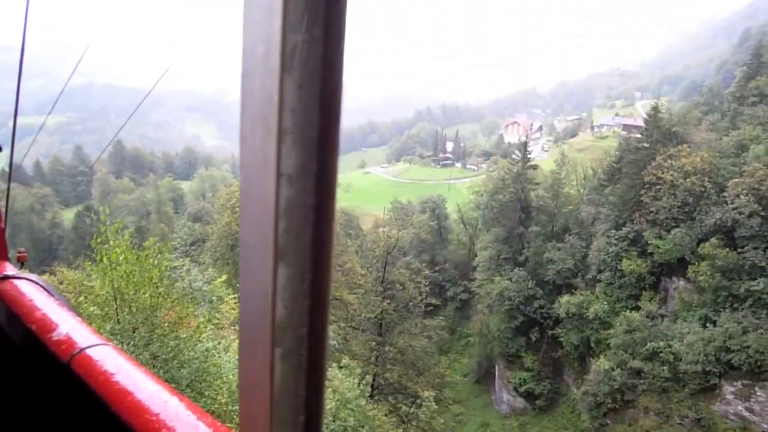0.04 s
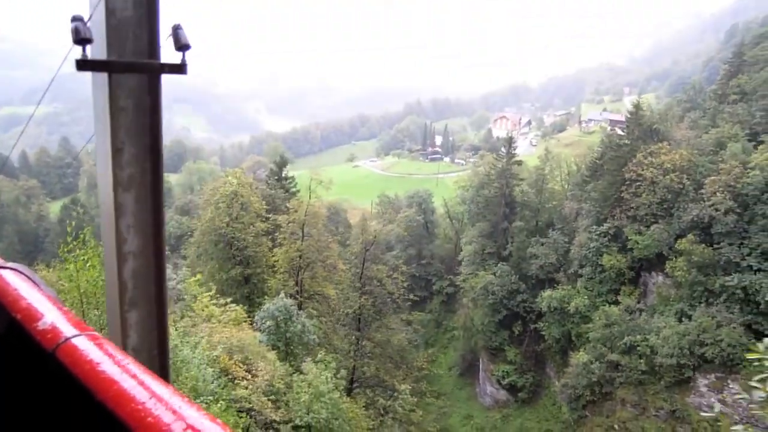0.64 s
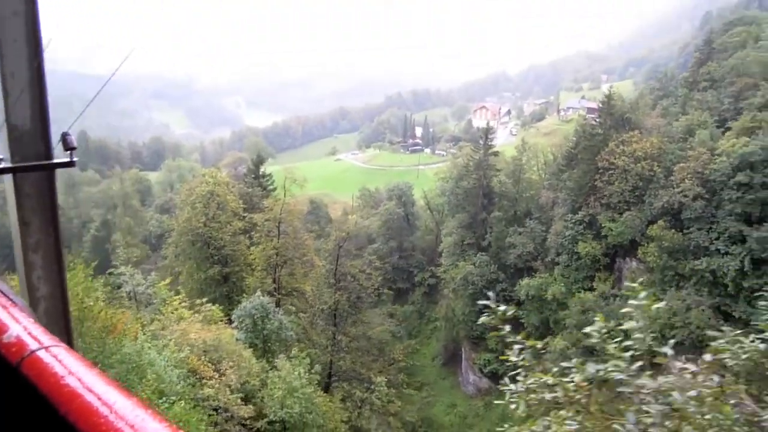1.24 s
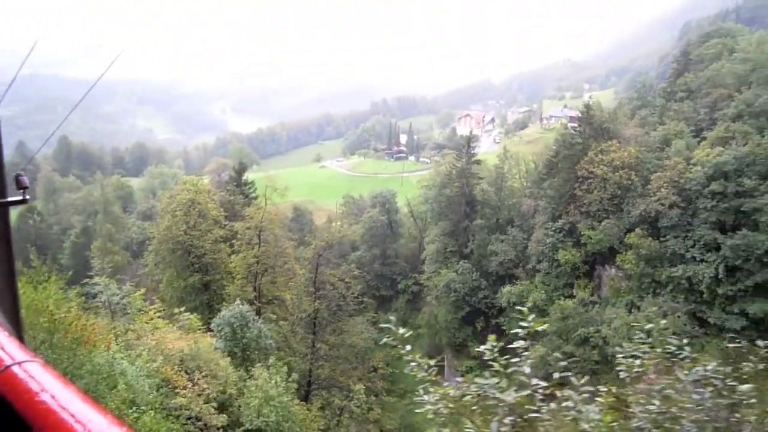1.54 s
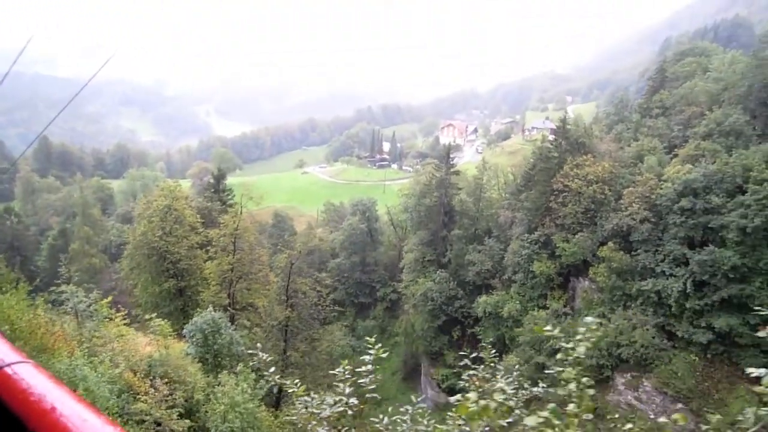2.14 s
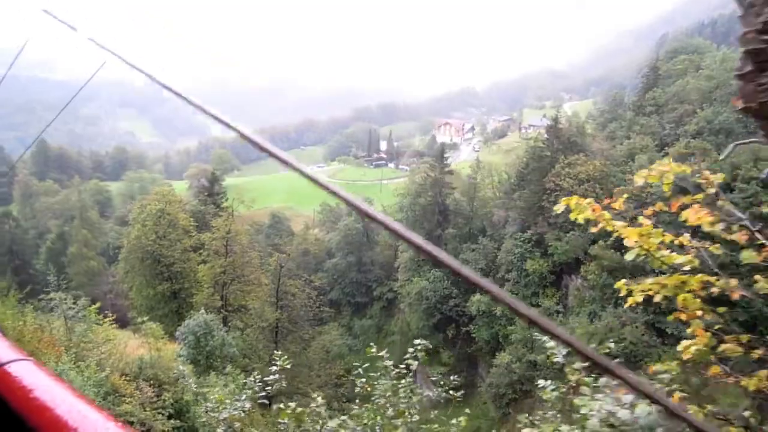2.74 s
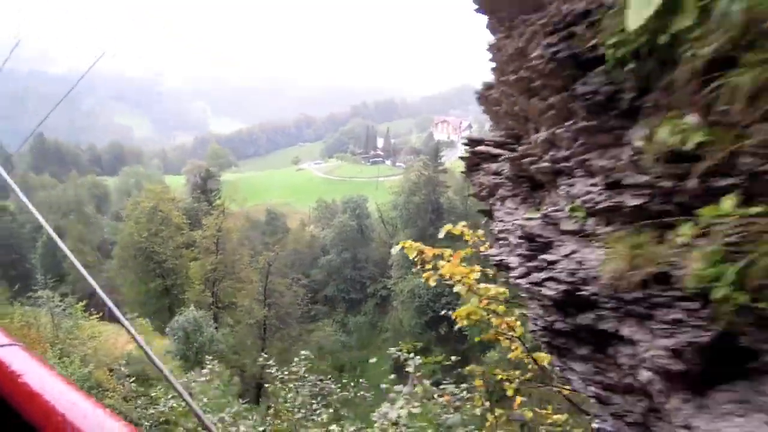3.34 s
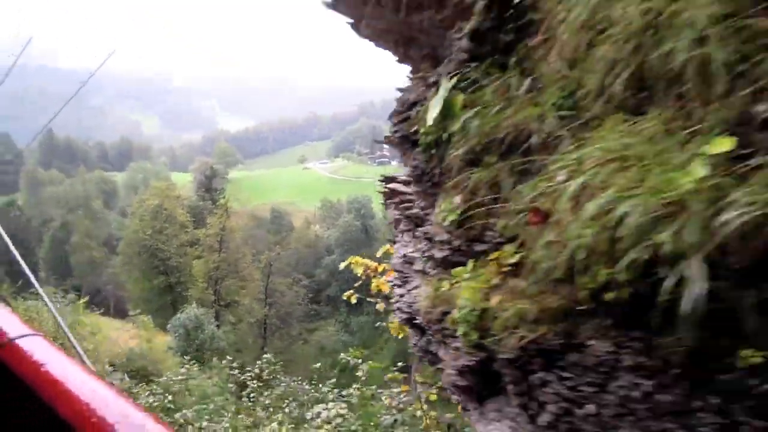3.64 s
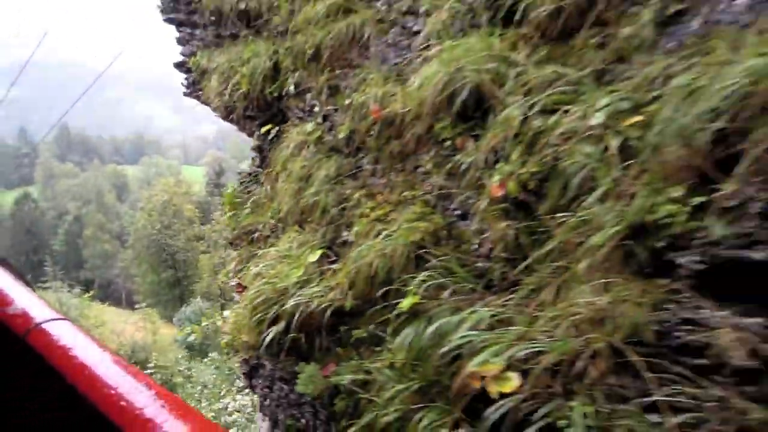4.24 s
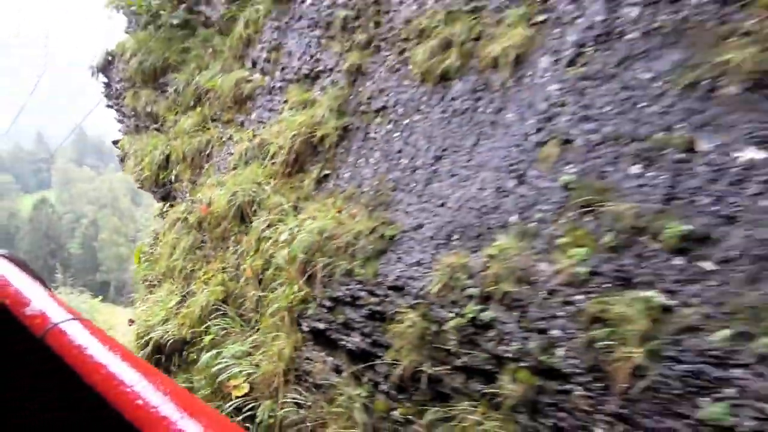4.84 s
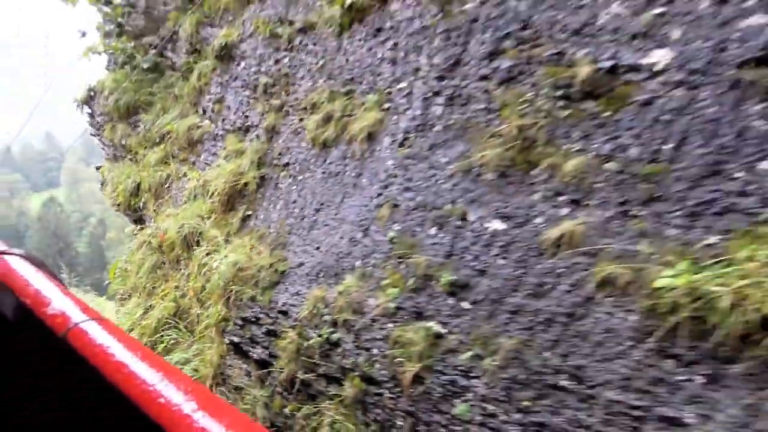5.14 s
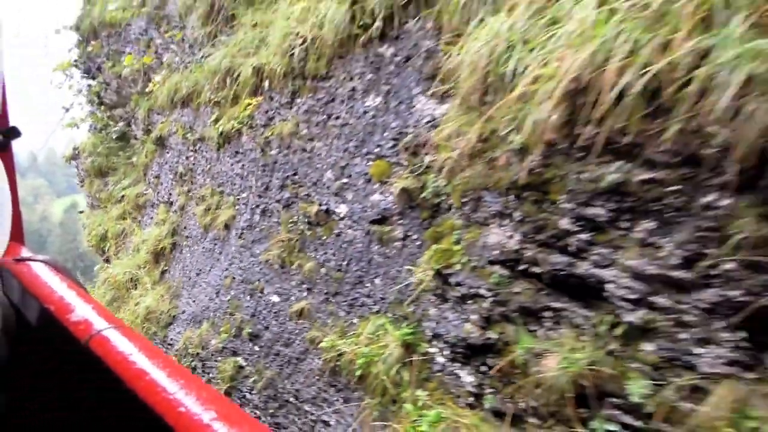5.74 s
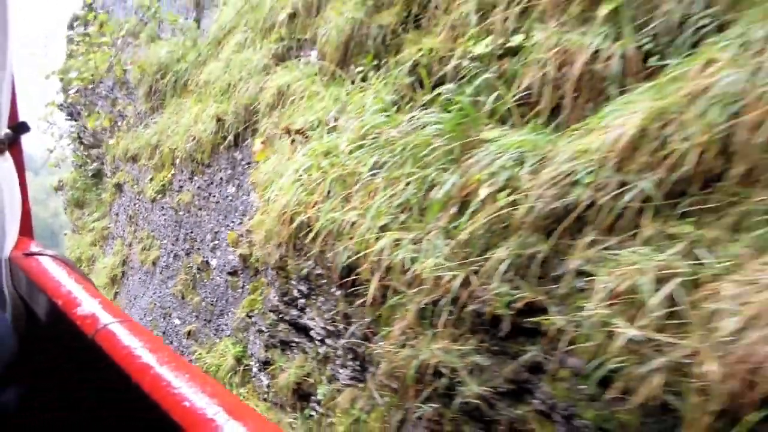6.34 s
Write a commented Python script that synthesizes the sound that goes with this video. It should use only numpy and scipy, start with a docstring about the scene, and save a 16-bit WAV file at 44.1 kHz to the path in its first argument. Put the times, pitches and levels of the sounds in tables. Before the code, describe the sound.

A funicular car rolls throughout with a low rumble and a steely rail hiss, heard from an open window. At about 0.8 seconds a thump and a puff of wind hit, with a quick run of dry clacks, and the rolling noise dips until 1.5. Short wheel squeaks, ticks and crunches of grit follow to about 2.3. From there to 4.1 a wheel rubs the rail in a thin, flickering squeal, strongest near 3.2, among knocks and floor jolts. The roar grows a little fuller as a rock face comes alongside. Around 4.4 comes a heavy jolt with a rattle, a gust and a swish of air; the rolling falls away over the continuing rumble. It builds again from 5.3 with clicks, knocks and a low cabin drone. A last gusty thump near 6 seconds leaves the rolling quieter.

```python
"""Funicular car from an open window.

The wheels rumble through the car body and hiss and ring on the rails; a flange rubs, a wheel squeaks.
The car jolts, fittings knock and tick, grit is crushed and the cabin drones; the rolling noise dips
after each big thump. Air swishes and buffets the two microphone ports; a rock face throws sound back."""
import sys
import numpy as np
from scipy import signal
from scipy.fft import rfft, irfft
from scipy.io import wavfile
from scipy.ndimage import uniform_filter1d

SR = 44100
rng = np.random.default_rng(int(sys.argv[2]) if len(sys.argv) > 2 else 0)


def bounce(signal):
    """Save signal as a 16-bit WAV file at the path given by the first command-line argument."""
    frames = np.transpose(np.atleast_2d(signal))
    limited = np.clip(frames, -1, 1)
    pcm = np.round(limited * 32767).astype(np.int16)
    wavfile.write(sys.argv[1], SR, pcm)


N = 286297
TIME = np.arange(N) / SR
HZ = np.fft.rfftfreq(N, 1 / SR)


# Rolling noise spectra: f/Hz, relative level/dB
BODY_SPECTRUM = [(120, -40), (220, 0), (270, -0.5), (370, -2), (520, -5), (620, -7), (780, -7),
                 (900, -12.5), (1200, -15), (4500, -66)]
RAIL_SPECTRUM = [(500, -27), (800, -5), (1000, -7), (1450, 1.5), (2300, 0), (2800, -4), (3300, -5.5),
                 (4000, -10), (4700, -18.5), (5800, -16.5), (10000, -26)]
HISS_SPECTRUM = [(2000, -38), (3800, 4), (5200, 1.5), (7000, -2), (9000, -4.5), (10500, -8.5),
                 (12000, -10.5), (14500, -26)]
# Wheel and rail modes: f/Hz, width/Hz, relative level/dB
WHEEL_MODES = [(794, 45, 0), (1470, 130, -5), (1760, 55, -2), (2240, 140, -1.5), (3146, 190, -2.5),
               (3440, 190, -4.5), (4560, 440, 2), (5200, 390, -6.5)]
def rolling(body_gain, rail_gain, hiss_gain, bumps):
    """Uneven rails drive the car body, the rails and the ringing wheels together."""
    roar = patchy(colour(grit(per_s=250, spread_db=1, share=0.18), BODY_SPECTRUM), depth_db=1.5)
    steel = patchy(colour(grit(per_s=900, spread_db=3, share=0.32), RAIL_SPECTRUM), depth_db=2.5)
    hiss = patchy(colour(grit(per_s=1500, spread_db=3.5, share=0.16), HISS_SPECTRUM), depth_db=2.5)
    wheel_db = -5 - 3.5 * beside_rock() + 0.77 * drift(rate_hz=14)
    return (body_gain * amp(-1.13 + bumps) * roar
            + rail_gain * amp(-1.38 + 0.91 * bumps) * steel
            + hiss_gain * amp(4.5 + 1.2 * bumps) * hiss
            + rail_gain * amp(wheel_db) * ring(noise(), WHEEL_MODES))


# Heard level of the rolling noise, dipping after each big thump: t/s, level/dB
ROLLING_LEVEL = [(0, -35), (0.82, -33), (0.835, -44), (1.28, -44.5), (1.6, -35), (2.1, -32), (3.25, -33.5),
                 (3.8, -33), (4.27, -35.5), (4.5, -32.5), (4.68, -50.5), (4.9, -53), (4.98, -45.5),
                 (5.2, -44.5), (5.32, -38), (5.68, -34.5), (6.02, -35), (6.16, -50), (6.49, -51.5)]
# Brief lulls in it: t/s, change/dB, half-length/s
LULLS = [(0.69, -1.5, .025), (0.88, -1, 0.053), (2.735, -3.5, 0.024), (3.02, -1.5, .04),
         (2.825, -3.5, 0.012), (3.85, -1, 0.031), (3.935, -2, 0.018), (5.46, -3, 0.048)]
def follow_rolling(base_db, slope, rock_db):
    """Level in dB of a layer that follows the rolling level and shifts beside the rock face."""
    usual_db = -32.5
    excess_db = np.interp(TIME, *np.transpose(ROLLING_LEVEL)) + rises_db(LULLS) - usual_db
    return base_db + slope * excess_db + rock_db * beside_rock()


# Response to the rolling level: base level/dB, slope/(dB/dB), change beside the rock/dB
LAYER_RESPONSE = {"rumble": (-22.5, 0.31, -0.62), "body": (-29, 0.82, 3.95), "rail": (-33, .96, 1.32),
                  "hiss": (-43.5, 0.98, -2.8)}
# Rough track: t/s, body roar rise/dB, half-length/s
ROUGH_TRACK = [(0.56, 7.5, 0.052), (1.69, 5.5, 0.029), (2.06, 3, 0.045), (2.38, 4, .03), (2.79, 7, 0.045),
               (3.69, 5.5, 0.055), (3.985, 3, 0.054), (4.37, 3.5, 0.18), (5.76, 2.5, 0.16)]
def ride_gains():
    """Gains of four layers; rough track lifts rumble and body, the leaning flange the rail."""
    level_db = {layer: follow_rolling(*response) for layer, response in LAYER_RESPONSE.items()}
    rough_db = rises_db(ROUGH_TRACK)
    open_air = amp(-56.5) * (1 - beside_rock())
    return (amp(level_db["rumble"] + 0.23 * rough_db),
            amp(level_db["body"] + rough_db),
            amp(level_db["rail"] + 0.39 * rises_db(FLANGE_LEANS)),
            np.hypot(amp(level_db["hiss"]), open_air))


# Car shake: f/Hz, relative level/dB
RUMBLE_SPECTRUM = [(8, -37), (20, -3), (38, -8), (58, -2), (95, -3), (120, -1.5), (145, -4.5), (175, -1.5),
                   (215, -9), (280, -17), (900, -100)]
# Floor jolts and panel booms: t/s, relative level/dB, f/Hz, half-length/s
FLOOR_JOLTS = [(0.485, -15.5, 125, 0.033), (0.829, -6, 119, 0.03), (0.905, -15, 131, 0.019),
               (0.99, -16, 124, 0.033), (1.06, -19, 87.8, 0.053), (1.432, -13.5, 124.8, 0.016),
               (2.015, -8, 122.6, 0.025), (2.39, -13, 119.2, 0.046), (2.54, -13.5, 109.7, 0.042),
               (2.67, -13, 125.2, 0.037), (3.662, -12, 135, 0.036), (3.912, -10.5, 122, 0.024),
               (4.008, -13.5, 108, 0.016), (4.11, -15.5, 89.4, 0.039), (4.40, -8, 119, 0.038),
               (5.59, -16, 118.8, 0.035), (5.96, -14.5, 119, 0.032), (6.24, -19.5, 125, 0.068)]
PANEL_BOOMS = [(2.372, -19.5, 538, 0.025), (3.70, -19, 350, 0.034), (3.645, -20.5, 230, .035),
               (3.955, -20.5, 249.4, 0.026), (3.6, -23, 697, 0.011), (3.962, -25, 1030, 0.011),
               (3.96, -29, 1220, 0.009), (4.40, -20, 350, 0.026), (4.478, -23, 740, 0.011),
               (4.48, -24, 990, 0.014)]
def rumble(gain):
    """The car shakes over a deep draught that slackens once; jolts swing the floor and panels boom."""
    shake = steadied(colour(noise(), RUMBLE_SPECTRUM), samples=3000)
    deep = lowpass(shake, cutoff_hz=70, power=6)
    draught = amp(2.5 - 9.5 * swell(peak_s=3.3, half_s=0.54))
    floor = amp(-1) * gain * (shake - deep + draught * deep)
    jolts = amp(-3.5) * tone_swells(FLOOR_JOLTS, waver=0.11, rate_hz=39)
    booms = amp(-2) * tone_swells(PANEL_BOOMS, waver=0.051, rate_hz=116)
    return floor + jolts + booms


# Flange leaning on the rail: t/s, rise/dB, half-length/s, f/Hz
FLANGE_LEANS = [(0.558, 5, 0.043, 1772), (2.26, 5, 0.062, 1750), (2.51, 8.5, 0.043, 1752),
                (2.623, 8, 0.055, 1794), (2.915, 9.5, 0.075, 1755), (3.201, 12, 0.13, 1773),
                (3.45, 9.5, 0.071, 1740), (3.764, 9, 0.04, 1793), (4.094, 7.5, 0.051, 1742)]
def flange():
    """The flange rubs the rail: a flickering note that swells and shifts pitch as it leans."""
    rest_hz = 1755
    pitch_hz = rest_hz + sum((hz - rest_hz) * swell(s, 2 * half_s) for s, _, half_s, hz in FLANGE_LEANS)
    phase = 2 * np.pi * np.cumsum(pitch_hz + 12 * drift(rate_hz=31)) / SR
    note = drift(rate_hz=56) * np.cos(phase) + drift(rate_hz=39) * np.sin(phase)
    flicker = amp(2 * drift(rate_hz=21))
    level_db = follow_rolling(base_db=-47, slope=0.65, rock_db=0) + rises_db(FLANGE_LEANS)
    return amp(level_db) * unit(note * flicker)


# Knocks: t/s, relative level/dB, decay/s, click level/dB
KNOCKS = [(0.797, -25.5, 0.014, -35), (0.813, -23.5, 0.0062, -32), (2.054, -28, 0.019, -37),
          (2.365, -25, 0.017, -36), (2.495, -21, 0.012, -40), (2.770, -19.5, .02, -35),
          (3.69, -18, 0.03, -50), (3.951, -20, 0.011, -40), (4.374, -20.5, 0.079, -37),
          (4.473, -27, 0.012, -40), (4.582, -34, .005, -52), (4.75, -35.5, 0.005, -64),
          (4.936, -31, 0.026, -41.5), (5.294, -25.5, 0.02, -31.5), (5.529, -29, 0.031, -36.5)]
# Fitting modes: f/Hz, width/Hz, relative level/dB
FITTING_MODES = [(390, 220, 3), (587, 240, -0.5), (789, 28, 0.5), (1098, 74, -4.5), (1440, 290, 3),
                 (1780, 270, -0.5), (2410, 78, -10), (2800, 250, -30), (4080, 340, -12)]
# Ticks and scuffs: t/s, level/dB, decay/s
TICKS = [(0.194, -35, .003), (0.4654, -28.5, 0.004), (0.517, -37, .003), (0.820, -29, 0.003),
         (1.563, -38, .003), (1.6128, -27, 0.028), (1.6637, -26.5, 0.0036), (2.2495, -27.5, 0.007),
         (2.3675, -31, .003), (2.663, -35, .003), (3.021, -33, .003), (5.0101, -37.5, .002),
         (5.04, -39, .002), (5.3404, -27, 0.0019), (5.352, -35, 0.05), (5.417, -35, 0.024),
         (5.536, -39, 0.02), (5.9285, -32.5, 0.012), (5.948, -29, 0.0028), (5.9669, -35, 0.014),
         (6.003, -33, 0.01)]
# Hard contact: f/Hz, relative level/dB
CLICK_SPECTRUM = [(300, -16), (1500, 2), (4000, 6), (8000, 3), (12000, -1.5), (14500, -9)]
def rattles():
    """Loose fittings strike with a click, then chatter; small hard parts tick in clusters of contacts."""
    bounces = steadied(grit(per_s=500, spread_db=2, share=0.5), samples=400)
    chatter = bursts([(s, db, decay_s) for s, db, decay_s, _ in KNOCKS], bounces)
    late_chatter = np.roll(chatter, round(0.0015 * SR))
    knocks = ring(amp(21) * strikes(KNOCKS) + amp(-2) * late_chatter, FITTING_MODES)
    clicks = [(s, click_db, decay_s) for s, _, decay_s, click_db in KNOCKS]
    contacts = steadied(grit(per_s=1200, spread_db=3.5, share=0.3), samples=200)
    return knocks + colour(bursts(clicks + list(TICKS), contacts), CLICK_SPECTRUM)


# Dry clacks under the car: t/s, relative level/dB
CLACKS = [(0.713, -16.5), (0.788, -20.5), (0.861, -20.5), (0.929, -24), (1.0105, -24.5), (1.083, -33)]
# Frame modes: f/Hz, width/Hz, relative level/dB
FRAME_MODES = [(400, 72, 3), (573, 99, 2), (806, 41, 4), (1100, 140, -4.5), (1446, 160, 0),
               (1800, 230, -1.5), (2390, 190, -4.5), (2800, 280, -11)]
def clacks():
    """Blunt blows chatter and ring in the steel frame; bending waves bring the treble first."""
    chatter_decay_s, delay_at_1khz_s = 0.009, 0.00197
    chatter = bursts([(s, db - 3.5, chatter_decay_s) for s, db in CLACKS], steadied(noise(), samples=90))
    blows = lowpass(amp(20) * strikes(CLACKS) + chatter, cutoff_hz=3150, power=6)
    dispersion = np.exp(-4j * np.pi * delay_at_1khz_s * np.sqrt(HZ * 1000))
    return irfft(rfft(ring(blows, FRAME_MODES)) * dispersion, N)


# Crushed grit: t/s, level/dB, decay/s
SCRAPES = [(1.688, -29, 0.03), (2.054, -25.5, 0.035), (2.172, -30, 0.018), (2.254, -27, 0.01),
           (2.776, -27.5, 0.018), (3.652, -31.5, 0.04), (5.296, -30, 0.013), (5.537, -28, 0.018)]
# Its spectrum: f/Hz, relative level/dB
SCRAPE_SPECTRUM = [(400, -22), (750, -3), (1300, -1.5), (2500, 0), (4200, -4), (5500, -16), (12000, -36)]
def scrapes():
    """A wheel crushes grit: a sudden clatter of coarse grains that dies away."""
    grains = steadied(grit(per_s=830, spread_db=2, share=0.56), samples=400)
    return colour(bursts(SCRAPES, grains), SCRAPE_SPECTRUM)


# Wheel squeaks: t/s, relative level/dB, f/Hz, half-length/s
SQUEAKS = [(1.422, -41, 3990, .02), (1.485, -38.5, 3985, .017), (1.42, -42, 2330, .018),
           (1.427, -36, 1750, .022), (1.515, -39, 1770, .018), (1.606, -31, 1761, .021),
           (1.70, -36, 1790, .014), (1.775, -36, 1800, .03), (1.89, -35, 1805, .012),
           (2.02, -31.5, 1825, .017), (2.185, -36, 1720, .014), (0.535, -34, 1765, .022),
           (3.76, -35, 2260, .025), (6.2, -51, 1250, .2)]
def squeaks():
    """A wheel sticks and slips in short, rough chirps."""
    roughness = amp(4 * drift(rate_hz=160))
    return roughness * tone_swells(SQUEAKS, waver=0.008, rate_hz=130)


# Cabin mode: f/Hz, width/Hz, relative level/dB
CABIN_MODE = [(191.2, 33, 0)]
# Spells of droning: t/s, level/dB, half-length/s
DRONES = [(0.15, -22, 0.09), (2.7, -21, 0.044), (3.61, -22, 0.05), (4.02, -27, 0.17), (4.33, -24.5, 0.15),
          (5.7, -23, 0.19), (5.99, -19.5, 0.068), (6.19, -32, 0.098)]
def drone():
    """The shaking wakes the low mode of the cabin in spells."""
    hum = ring(ring(noise(), CABIN_MODE), CABIN_MODE)
    return swells(DRONES) * steadied(hum, samples=3000)


# Air on the microphone: f/Hz, relative level/dB
BUFFET_SPECTRUM = [(8, -15), (25, 1), (70, 4.5), (130, -9), (300, -14), (1200, -34.5), (12000, -76)]
# Gusts on both ports, eddies on each alone: t/s, level/dB, half-length/s
GUSTS = [(0.146, -22.5, 0.082), (0.821, -14, 0.024), (4.396, -12.5, 0.016), (4.465, -19, 0.044),
         (5.664, -17, 0.068), (5.935, -11.5, 0.02), (6.01, -18.5, 0.069), (6.155, -25, 0.18)]
EDDIES = [(0.01, -36, 0.03), (0.32, -38, 0.037), (0.95, -49, 0.05), (1.24, -44, 0.045), (2.03, -33, 0.025),
          (2.85, -37, 0.027)]
def buffet(puffs):
    """Short lumps of air strike the microphone."""
    return swells(puffs) * steadied(colour(noise(), BUFFET_SPECTRUM), samples=1500)


# Passing air: t/s, level/dB, half-length/s
SWISHES = [(1.44, -43, 0.16), (3.665, -40, .02), (3.975, -35, 0.019), (4.454, -28.5, 0.026),
           (4.525, -32.5, 0.029), (5.07, -44.5, 0.028), (5.28, -44, 0.02)]
# Its spectrum: f/Hz, relative level/dB
SWISH_SPECTRUM = [(900, -25), (3500, 3.5), (7500, -1), (10000, -5), (14000, -19)]
def swishes():
    """Air hisses past the window, most of all close to the rock face."""
    return swells(SWISHES) * colour(noise(), SWISH_SPECTRUM)


# High rail modes: f/Hz, width/Hz, relative level/dB
RAIL_MODES = [(1740, 45, -5), (3980, 300, -4), (4630, 310, 5), (5300, 500, -0.5)]
def rail_singing():
    """The rails sing faintly on their high modes until the rock face is reached."""
    return amp(-48.5) * (1 - beside_rock()) * ring(noise(), RAIL_MODES)


def faint_ticks(hiss_gain):
    """Small parts tick at random; their level follows the hiss."""
    per_s, decay_s = 7, 0.0025
    onsets = (rng.random(N) < per_s / SR) * amp(-2 + 3 * rng.uniform(-1, 1, N))
    envelope = signal.lfilter([1], [1, -np.exp(-1 / (decay_s * SR))], onsets + 1e-18)
    return hiss_gain * envelope * colour(noise(), CLICK_SPECTRUM)


# Sizzle mode: f/Hz, width/Hz, relative level/dB
SIZZLE_MODE = [(11800, 2000, 0)]
def sizzle():
    """A thin, high hiss sounds briefly and stops at the first big thump."""
    start_s, end_s = 0.49, 0.825
    gate = uniform_filter1d(1.0 * (TIME > start_s) * (TIME < end_s), size=900)
    return amp(-57) * gate * ring(ring(noise(), SIZZLE_MODE), SIZZLE_MODE)


def beside_rock():
    """0 on the open slope, 1 beside the rock face."""
    reached_s, fade_s = 3.2, 0.49
    return 0.5 + 0.5 * np.tanh((TIME - reached_s) / fade_s)


def thrown_back(x):
    """Below the treble, the open slope scatters little and the rock face much."""
    lower = lowpass(x, cutoff_hz=2800, power=4)
    return x - lower + amp(-7 + 7 * beside_rock()) * lower


# Likeness of the ports: f/Hz, coherence/0-1
PORT_COHERENCE = [(35, .999), (90, .9996), (180, .9996), (350, .996), (700, .977), (1400, .935),
                  (2400, .89), (3500, .84), (7500, .78), (10000, .52), (13000, .25)]
# Balance before shadow weighting: f/Hz, left minus right/dB
PORT_BALANCE = [(1500, -0.5), (3800, 1.5), (5500, -0.5), (8000, -2.5), (9500, -1.5), (11500, -9.5),
                (14000, -9.5)]
# Phase between the ports: f/Hz, left lead/rad
PORT_PHASE = [(300, 0), (2070, 0.19), (4740, -1.33), (8180, -2), (9560, -3.0), (14400, -2.5)]
def ports(direct, scattered):
    """Both ports share the bass; the top treble is partly scattered, later and weaker on the left."""
    coherence = np.clip(curve(PORT_COHERENCE), 0, 1)
    shared = rfft(direct) * np.sqrt((1 + coherence) / 2)
    apart = 1j * rfft(scattered) * np.sqrt((1 - coherence) / 2)
    shadow = np.clip(HZ / 3000, 0, 1) ** 2  # long waves bend round the housing
    tilt = amp(shadow * curve(PORT_BALANCE) / 2)
    left = (shared + apart) * tilt * np.exp(1j * curve(PORT_PHASE))
    right = (shared - apart) / tilt
    return irfft(np.array([left, right]), N)


def grit(per_s, spread_db, share):
    """Rolling contact: smooth noise, with a share of the power in tiny impacts of uneven size."""
    hits = (rng.random(N) < per_s / SR) * rng.choice([-1, 1], N)
    sizes = amp(spread_db * np.minimum(rng.exponential(1, N), 4))
    return np.sqrt(1 - share) * noise() + np.sqrt(share) * unit(hits * sizes)


def patchy(x, depth_db):
    """Neighbouring bands flare and fade on their own as the contact point wanders."""
    frames = dict(nperseg=512, noverlap=384)
    bands = signal.stft(x, **frames)[2]
    flare = uniform_filter1d(rng.standard_normal(bands.shape), size=5, axis=0)
    flare = unit(uniform_filter1d(flare, size=12, axis=1))
    return unit(signal.istft(bands * amp(depth_db * flare), **frames)[1][:N])


def ring(x, modes):
    """Drives damped modes, keeping the power of white noise."""
    t = TIME[:SR // 4]
    response = sum(amp(db) * np.sqrt(width_hz) * np.exp(-np.pi * width_hz * t) * np.sin(2 * np.pi * hz * t)
                   for hz, width_hz, db in modes)
    return signal.oaconvolve(x, response / np.linalg.norm(response))[:N]


def strikes(rows):
    """One sharp impact per row."""
    impacts = np.zeros(N)
    for s, db, *_ in rows:
        impacts[round(s * SR)] = amp(db)
    return impacts


def bursts(rows, grains):
    """Each blow is a sudden chatter of contacts that dies away."""
    return grains * sum(amp(db) * (TIME >= s) * np.exp(-abs(TIME - s) / decay_s) for s, db, decay_s in rows)


def tone_swells(rows, waver, rate_hz):
    """Each row is one mode that swells and dies, wavering in pitch."""
    warped_s = np.cumsum(1 + waver * drift(rate_hz)) / SR
    return sum(amp(db) * swell(s, half_s) * np.sin(2 * np.pi * hz * warped_s)
               for s, db, hz, half_s in rows)


def swell(peak_s, half_s):
    """Bell curve, down to 1/e at half_s from its peak."""
    return np.exp(-np.minimum(((TIME - peak_s) / half_s) ** 2, 50))


def swells(rows):
    """Bell curves summed as gain."""
    return sum(amp(db) * swell(s, half_s) for s, db, half_s in rows)


def rises_db(rows):
    """Bell curves summed in dB."""
    return sum(db * swell(s, half_s) for s, db, half_s, *_ in rows)


def noise():
    """White noise, rms 1."""
    return rng.standard_normal(N)


def drift(rate_hz):
    """Random wander up to a rate, rms 1."""
    return unit(irfft(rfft(noise()) * HZ / (HZ + 2) / (1 + (HZ / rate_hz) ** 4), N))


def steadied(x, samples):
    """Evens out the slow swells of a noise."""
    return x / np.sqrt(uniform_filter1d(x ** 2, samples) + 1e-12)


def colour(x, spectrum):
    """Filters by a spectrum, keeping the power of white noise."""
    return irfft(rfft(x) * unit(amp(curve(spectrum))), N)


def lowpass(x, cutoff_hz, power):
    """Zero-phase treble cut."""
    return irfft(rfft(x) / (1 + (HZ / cutoff_hz) ** power), N)


def curve(points):
    """Joins points on a log frequency axis."""
    hz, value = np.transpose(points)
    return np.interp(np.log(HZ + 1), np.log(hz + 1), value)


def amp(db):
    """Decibels to gain."""
    return 10 ** (np.asarray(db) / 20)


def unit(x):
    """Scales to rms 1."""
    return x / np.sqrt(np.mean(x ** 2) + 1e-20)


def scene():
    """The car's sounds arrive directly and scattered by the cabin and the slope."""
    rumble_gain, body_gain, rail_gain, hiss_gain = ride_gains()
    bumps = drift(rate_hz=26.5)
    direct, scattered = (
        rolling(body_gain, rail_gain, hiss_gain, bumps) + rumble(rumble_gain) + drone() + buffet(GUSTS)
        + rattles() + clacks() + scrapes() + swishes() + squeaks() + rail_singing() + sizzle()
        for _ in range(2))
    direct += faint_ticks(hiss_gain) + flange()
    scattered += amp(7) * flange()  # the cabin scatters this note strongly
    eddies = np.array([buffet(EDDIES) for _ in range(2)])
    return ports(direct, thrown_back(scattered)) + eddies


def record(dry):
    """Rounds off the largest swings, then limits the band."""
    ceiling, edge_hz = amp(-5.5), 14430
    rounded = dry / (1 + (dry / ceiling) ** 8) ** (1 / 8)
    band_limit = signal.firwin(511, edge_hz, window=("kaiser", 9), fs=SR)
    return signal.oaconvolve(rounded, band_limit[None], "same")


dry = scene()
out = record(dry)
bounce(out)
```